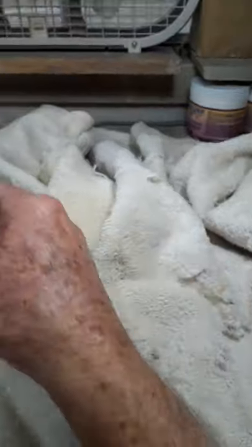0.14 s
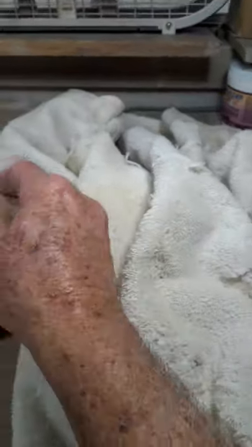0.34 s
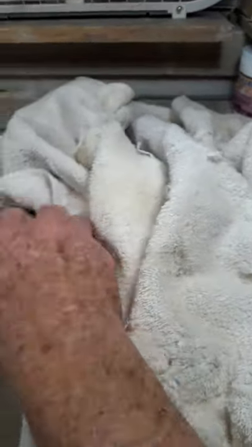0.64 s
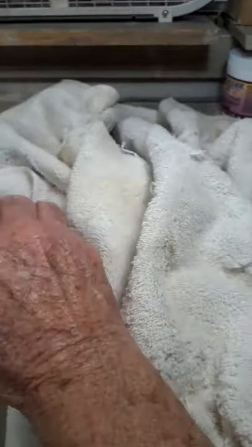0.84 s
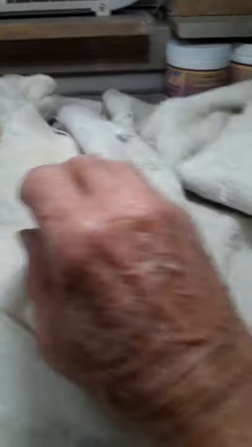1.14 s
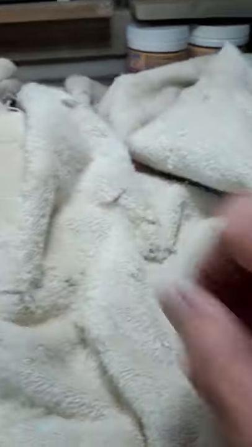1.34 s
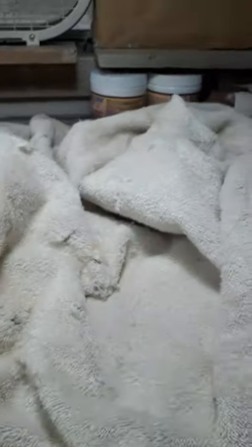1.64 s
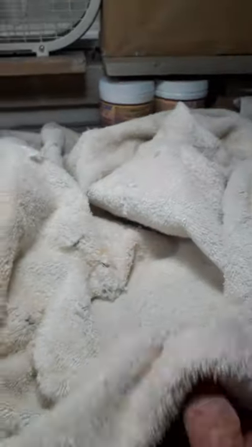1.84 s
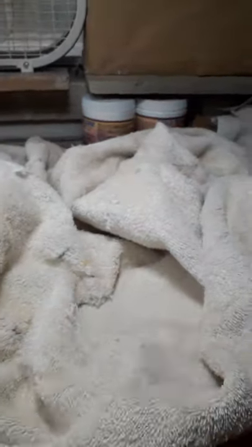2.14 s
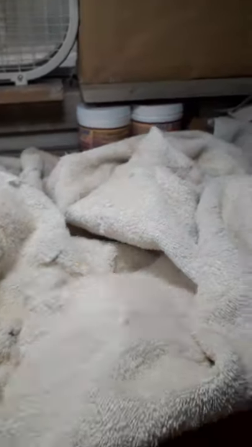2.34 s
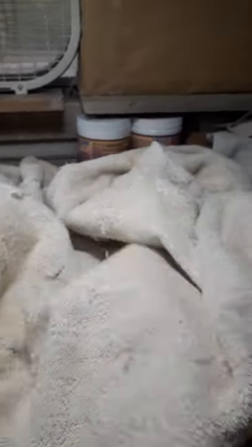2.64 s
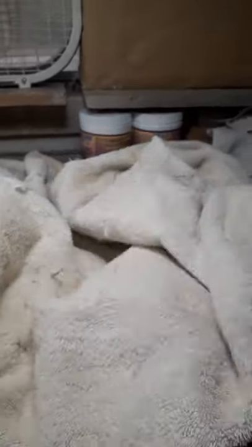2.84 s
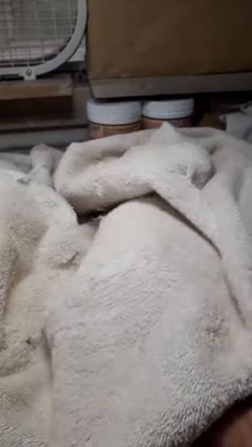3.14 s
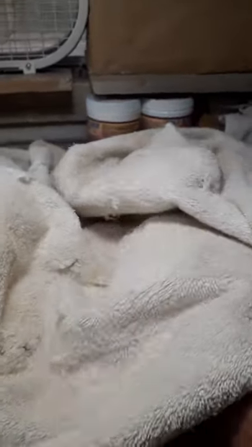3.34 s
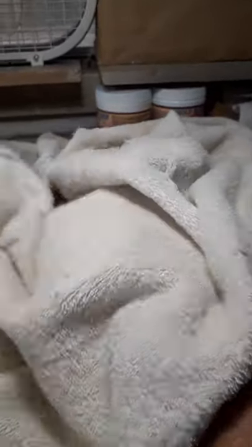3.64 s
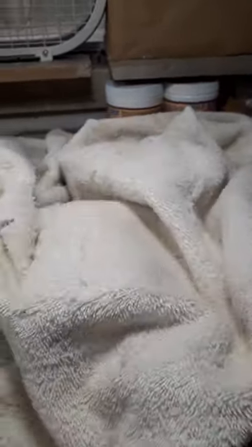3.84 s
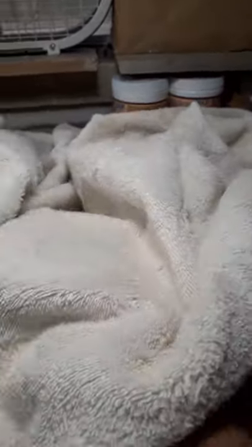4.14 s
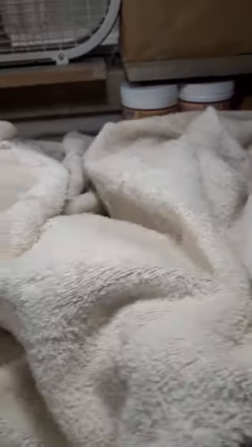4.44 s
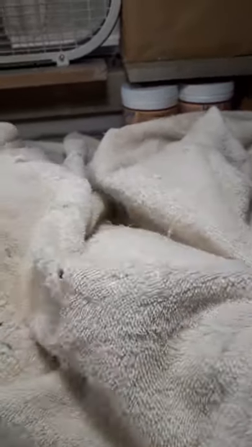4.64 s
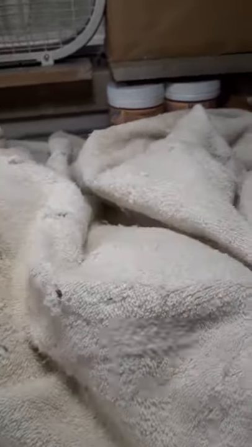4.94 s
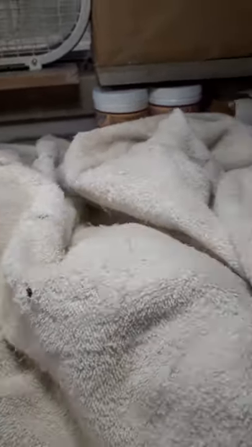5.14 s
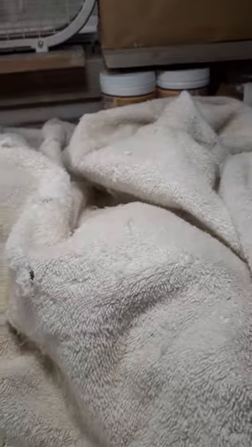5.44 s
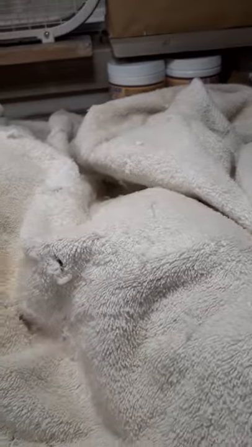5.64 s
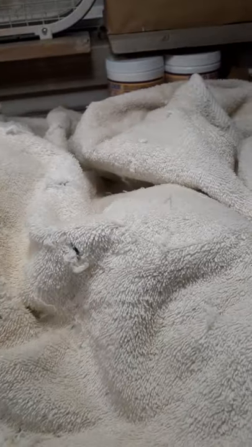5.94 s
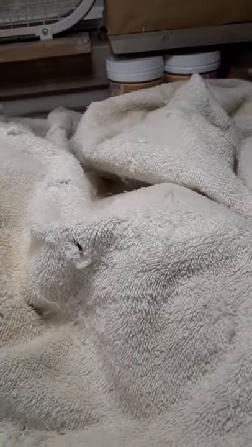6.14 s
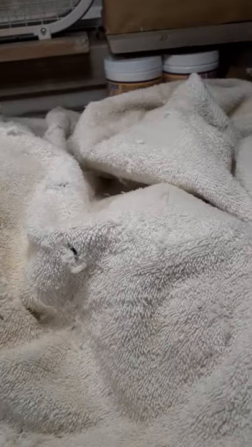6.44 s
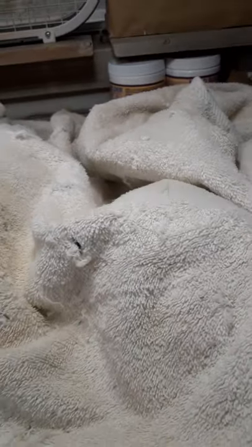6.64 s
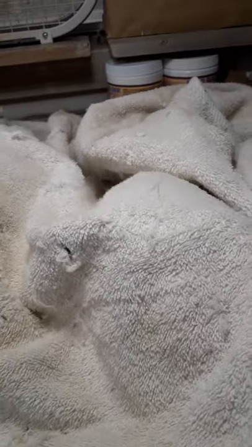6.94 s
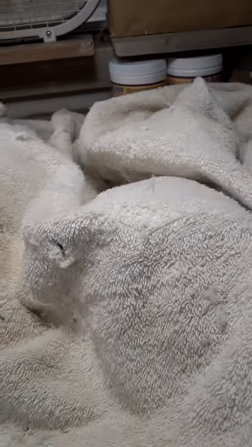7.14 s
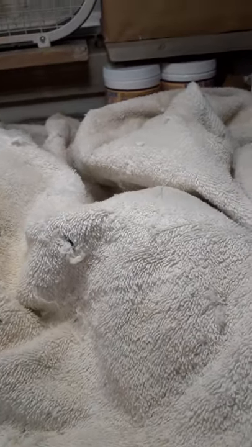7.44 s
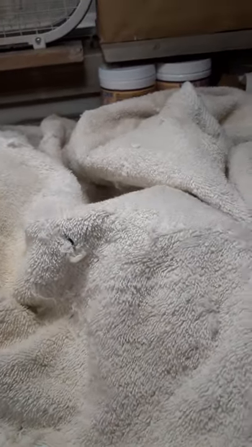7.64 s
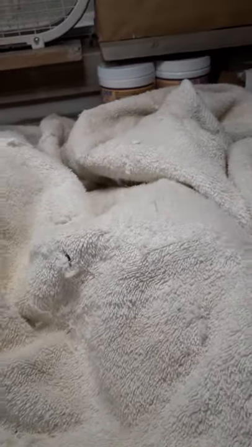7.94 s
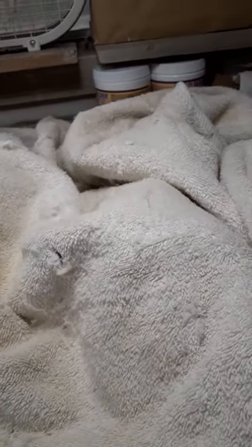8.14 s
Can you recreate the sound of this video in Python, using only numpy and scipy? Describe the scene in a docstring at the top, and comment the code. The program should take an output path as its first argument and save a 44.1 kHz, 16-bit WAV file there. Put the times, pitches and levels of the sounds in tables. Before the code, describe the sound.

Stones knock and grind together on a towel-covered wooden table, with low rumbles and soft brushing of cloth.

```python
"""Hard stones click and grind against each other as a hand sorts them on a towel.
Each knock leaves a faint, very high ring. The weight of the stones thuds and rumbles through the cloth
into the wooden table below. In between, the towel is lifted and brushed close by, and its cotton loops
hiss. A small, quiet room adds a short echo."""
import sys
import numpy as np
from scipy import signal
from scipy.fft import rfft, irfft, next_fast_len
from scipy.io import wavfile

SR = 44100
rng = np.random.default_rng(int(sys.argv[2]) if len(sys.argv) > 2 else 0)


def log_audio(samples):
    """Write samples as a 16-bit WAV file to the path given in sys.argv[1]."""
    # one column per channel
    frames = np.atleast_2d(samples).T
    # limit to full scale, then quantise
    limited = np.clip(frames, -1, 1)
    pcm = np.round(limited * 32767).astype(np.int16)
    wavfile.write(sys.argv[1], SR, pcm)


N = 366030
TIME = np.arange(N) / SR

# Levels in the tables are relative: each function adds its own gain. A positive pan_db means left.
# One stone hits another: start_s, level_db, pitch_hz, pan_db, ring_db, ring_hz
STONE_HITS = [(0.5827, -21, 4250, 2, -21.5, 11950), (0.6143, -18.5, 3580, 3, -27.5, 11900),
              (0.6405, -16, 2780, 3.5, -25.5, 11430), (0.6603, -29, 2800, 17, -41, 8980),
              (0.9981, -27, 3670, 4.5, -49, 11750), (1.0509, -32.5, 2670, 13, -40.5, 11530),
              (1.1129, -29.5, 2630, 7, -46.5, 11440), (3.6142, -26, 2200, -1, -41.5, 11750),
              (3.6277, -25.5, 2070, 13.5, -42, 11070), (3.9011, -36, 1260, -4.5, -64, 11600),
              (3.9864, -23, 2830, -2, -27, 11070), (4.248, -32, 2000, -7, -44.5, 11900),
              (4.2905, -30, 2050, -3, -48, 11800), (4.345, -25, 1910, -3.5, -47, 11650),
              (4.7297, -24, 2130, -2, -60, 11690), (4.7764, -9, 2480, -2.5, -33.5, 11880),
              (4.788, -18, 2320, -12, -61, 11960), (4.7987, -20, 2190, -0.5, -66, 11540),
              (4.8577, -24, 1650, -11, -50.5, 11060), (5.0112, -21.5, 1910, -7.5, -49, 11000),
              (5.121, -31, 1360, -4, -88, 11860), (5.7577, -30, 1960, -5, -62.5, 11060),
              (5.8529, -31.5, 2760, -3.5, -62, 11070), (6.143, -16.5, 3320, -1.5, -36, 11580),
              (6.984, -28, 2640, -1.5, -38.5, 11850), (7.1401, -32.5, 2480, -2, -50, 11800),
              (7.161, -34, 2440, 0, -50, 12400), (7.2952, -36.5, 2200, -1.5, -57.5, 11450),
              (7.603, -19, 2600, -8, -33.5, 11820), (7.6553, -25.5, 2740, 1, -34.5, 11060),
              (7.869, -24, 1250, -23, -68, 11070), (7.912, -24.5, 2760, 3.5, -61, 11650)]
# Peaks and a dip that colour every clack and scrape: pitch_hz, width_hz, gain_db
CLACK_TONE = [(2480, 230, 4), (2517, 87, 1), (3240, 430, -2.5), (4500, 1600, 1), (6300, 2900, 3)]
STONE_RESONANCE_DB = 4  # each knock rings a little at its own pitch, each scrape at 1.8 times its pitch


def knocks():
    """Each hit is a dry click that sets the stones ringing and bounces twice, sooner and weaker."""
    out = np.zeros((2, N))
    bounce_s, bounce_shrink, bounce_loss_db = .014, 0.6, 14.5
    for start_s, level_db, hz, pan_db, ring_db, ring_hz in STONE_HITS:
        click = contact(close_echoes(level_db=-2.5, fade_s=0.0041), hz, width=2.15, crack_db=-16)
        click = coloured(click, CLACK_TONE + [(hz, hz * 0.18, STONE_RESONANCE_DB)])
        click = from_db(level_db + 5.5) * placed(click / np.abs(click).max(), pan_db)
        delays_s = bounce_s * rng.uniform(.8, 1.3) * np.array([0, 1, 1 + bounce_shrink])
        for bounce, delay_s in enumerate(delays_s):
            add(out, start_s - .0003 + delay_s, from_db(-bounce * bounce_loss_db) * click)
        add(out, start_s, from_db(ring_db + 5) * stone_ring(ring_hz))
    return out


# The notes of a freely ringing stone: pitch_hz, level_db, ring_s (time to fade by 60 dB)
STONE_NOTES = [(8985, -8, .18), (11070, -1, .07), (11435, -2, .14), (12150, 0, .1), (12290, -3, .12),
               (14100, -13, .07)]


def stone_ring(ring_hz, rise_s=.0015, ring_share=0.7):
    """A struck stone favours its notes near ring_hz; fingers and cloth cut the ring to ring_share."""
    t = np.arange(9000) / SR
    note_hz, note_db, ring_s = np.transpose(STONE_NOTES)[:, :, None]
    fade = (1 - np.exp(-t / rise_s)) * from_db(-60 * t / (ring_s * ring_share))
    apart_hz = np.abs(note_hz - ring_hz)
    loss_db = 5.8 * (np.log2(1 + apart_hz / 60) + apart_hz / 700)
    strength = from_db(note_db - loss_db + rng.normal(0, 1.6, (2, len(ring_s), 1)))
    # such short waves reach left and right out of step
    left_phase = rng.random(note_hz.shape)
    right_phase = left_phase + rng.normal(0.24, 0.081, note_hz.shape)
    tones = np.sin(2 * np.pi * (note_hz * t + np.array([left_phase, right_phase]))) * fade
    return np.sum(strength * tones, axis=1) / np.sqrt(np.sum(strength ** 2) / 2)


def contact(force, hz, width, crack_db):
    """A jolted stone sends out about two waves; the shorter the touch, the higher the pitch."""
    top_hz = min(hz * width, .4 * SR)
    body = filtered(force, 1, [min(hz / width, top_hz / 1.2), top_hz], "band")
    body = filtered(body, 2, 420, "high")
    rounded = filtered(body, 6, min(hz * 1.73, SR / 3), "low")
    crack = filtered(body, 3, min(hz * 2.6, SR / 3), "low")
    return rounded + from_db(crack_db) * crack


# One stone slides on another: peak_s, rise_s, fall_s, level_db, pitch_hz
STONE_SLIDES = [(0.621, 0.022, 0.078, -27.5, 3560), (0.763, 0.052, 0.061, -36.5, 1550),
                (0.95, 0.12, 0.069, -56, 1000), (1.005, 0.011, 0.23, -50, 4350),
                (1.13, 0.046, 0.052, -45.5, 3080), (3.69, 0.053, .04, -44.5, 1620),
                (4.249, 0.046, 0.061, -39, 1340), (4.35, 0.085, 0.21, -40, 1580),
                (4.8, 0.045, 0.017, -25.5, 1760), (5.003, 0.017, 0.036, -26.5, 1790),
                (5.187, 0.0064, 0.018, -43.5, 1330), (5.57, 0.08, 0.064, -56.5, 1510),
                (5.73, 0.025, 0.048, -48.5, 1440), (5.82, 0.016, .013, -36, 1130),
                (5.862, .008, 0.024, -40, 1700), (6.075, 0.022, 0.032, -37.5, 1560),
                (6.155, 0.042, 0.049, -35, 2570), (6.208, 0.017, 0.017, -33.5, 1650),
                (6.582, 0.042, .046, -55, 1314), (7.432, 0.0052, 0.025, -42.5, 1880),
                (7.523, .009, 0.033, -42, 1090), (7.615, 0.045, 0.17, -34, 1360),
                (7.78, 0.089, 0.041, -41.5, 1940), (7.955, 0.067, .027, -35, 1580)]


def scrapes(skid_rise_s=0.0071, skid_fall_s=0.038):
    """Rough faces catch and slip; each slip is a tiny knock that also keeps the stones ringing."""
    out, pressure = np.zeros((2, N)), np.zeros((2, N))
    t = np.arange(-5000, 9000) / SR
    # after each hit the stone skids, quieter and a little lower than the click
    skids = [(start_s + skid_rise_s, skid_rise_s, skid_fall_s, db - 19.5, hz * 0.85)
             for start_s, db, hz, *_ in STONE_HITS]
    for peak_s, rise_s, fall_s, level_db, hz in list(STONE_SLIDES) + skids:
        swell = from_db(level_db) * stroke(t, rise_s, fall_s)
        echoes = close_echoes(level_db=-0.5, fade_s=0.0012)
        slips = signal.fftconvolve(echoes, grains(1100, 4.1, len(t))[None])[:, :len(t)]
        rasp = contact(slips, hz, width=2.97, crack_db=-12.5)
        stone_resonance = (hz * 1.8, hz * 0.064, STONE_RESONANCE_DB)
        rasp = rms_one(coloured(rasp, CLACK_TONE + [stone_resonance]))
        pan_db = np.interp(peak_s, [1.2, 3.6], [2, -5])  # early stones lie left, later ones right
        add(out, peak_s + t[0], from_db(0.5) * swell * placed(rasp, pan_db))
        add(pressure, peak_s + t[0], swell * rms_one(slips))
    singing = sum(from_db(db) * ring(pressure, hz, ring_s) for hz, db, ring_s in STONE_NOTES[1:])
    return out + from_db(-48) * singing


# A stone or the hand lands on the cloth: start_s, level_db, push_hz (higher is a shorter push)
LANDINGS = [(0.002, -32.5, 392), (0.443, -45, 152), (0.578, -25, 154), (0.641, -26, 155),
            (0.995, -31.5, 135), (1.572, -33.5, 101.6), (2.042, -35.5, 102), (2.546, -32.5, 153),
            (2.842, -28.5, 113), (3.303, -52, 114), (3.746, -27.5, 138), (3.777, -27, 384),
            (3.984, -18, 403), (4.66, -26.5, 153), (4.767, -25.5, 109), (5.681, -40.5, 148),
            (5.749, -33.5, 127), (5.808, -36, 278), (6.143, -27, 272), (7.292, -35.5, 161),
            (7.422, -40, 153), (7.515, -38.5, 148), (7.648, -37, 382), (7.865, -18, 312)]


def thuds():
    """The cloth softens each landing into one smooth push on the table."""
    out, t = np.zeros((2, N)), np.arange(10000) / SR
    for start_s, level_db, push_hz in LANDINGS:
        phase = 2 * np.pi * push_hz * t
        push = (1 - phase / 2) * phase * np.exp(-phase)
        thud = table_top(push)
        add(out, start_s, from_db(level_db - 5) * thud / np.abs(thud).max())
    return out


# The notes of the wooden table: pitch_hz, level_db, ring_s (time to fade by 60 dB)
WOOD_NOTES = [(59, -9.5, 0.06), (99.6, 0, 0.12), (118.5, 7, 0.056), (157, 4.5, 0.08), (217, -3.5, 0.092),
              (273, -0.5, 0.12), (320, -2.5, 0.13), (378.4, 1, 0.12), (467.5, 2.5, 0.048), (510, -3, 0.069),
              (641, -4, 0.058), (767, -10.5, 0.055), (960.5, -6.5, 0.065)]


def table_top(force):
    """The wood answers any push with the same low, quickly fading notes."""
    return sum((-1) ** k * from_db(db) * ring(force, hz, ring_s)
               for k, (hz, db, ring_s) in enumerate(WOOD_NOTES))


# The hand rolls the stones over: peak_s, rise_s, fall_s, rumble_db, hiss_db
STONE_ROLLS = [(0.01, 0.06, 0.077, -44, -66), (0.635, 0.043, 0.18, -34.5, -59), (1.06, 0.15, .13, -49, -64),
               (1.949, .06, 0.27, -53.5, -76), (2.252, 0.39, 0.25, -53.5, -56.5),
               (3.652, 0.046, 0.15, -39, -62), (4.062, 0.12, 0.079, -33.5, -63),
               (4.43, 0.45, .4, -37, -57.5), (4.799, 0.16, 0.16, -32.5, -55),
               (5.02, 0.044, 0.073, -40.5, -66), (5.17, 0.2, 0.22, -51.5, -79.5),
               (5.52, 0.053, 0.18, -57.5, -96), (5.859, 0.14, 0.08, -42, -113),
               (6.189, 0.14, 0.1, -36, -80.5), (6.588, .1, 0.12, -42.5, -71.5),
               (7.019, 0.076, 0.17, -42.5, -67.5), (7.2, 0.19, 0.19, -49, -73),
               (7.661, .14, 0.14, -32.5, -58), (7.921, 0.039, 0.11, -32, -58.5),
               (8.169, 0.087, 0.14, -50, -72.5)]
# The tone of their gritty crunch: pitch_hz, level_db
GRIT_TONE = [(300, -24), (600, 6.5), (1000, -6), (1500, -2.5), (2400, -4.5), (3200, -8.5), (4800, -12.5),
             (7000, -38), (16000, -47)]
SETTLE_RISE_S = 0.0063  # how fast a landed stone starts to settle into the cloth


def rolling(settle_db=-20.5, settle_fall_s=0.13):
    """Stones tumble over folds or settle after landing: bumps shake the table, with crunch and ticks."""
    rolls = [(peak_s, rise_s, fall_s, db) for peak_s, rise_s, fall_s, db, _ in STONE_ROLLS]
    settling = [(start_s, SETTLE_RISE_S, settle_fall_s, db + settle_db) for start_s, db, _ in LANDINGS]
    bumps = [table_top(grains(200, 2.7, N)) for _ in range(2)]
    lurches = from_db(-1.5 + 4 * drift(per_s=28))  # the stones roll unevenly
    rumble = lurches * stereo(*bumps)
    grit = from_db(-15 + 4.52 * drift(per_s=60)) * stereo(*grains(2500, 1.8, (2, N)), GRIT_TONE)
    touches = grains(per_s=12, uneven_db=3, size=N)
    ticks = from_db(-24) * rms_one(contact(touches, hz=2120, width=1.4, crack_db=-14))
    return swells(rolls + settling) * (rumble + grit + ticks)


# The towel alone is lifted and brushed: peak_s, rise_s, fall_s, level_db
TOWEL_BRUSHES = [(1.58, 0.0087, 0.17, -63.5), (1.73, 0.095, 0.048, -60), (1.92, 0.072, 0.06, -52.5),
                 (2.15, 0.0091, 0.024, -47), (2.2, 0.15, 0.31, -53.5), (2.58, .08, 0.022, -50.5),
                 (2.79, 0.098, 0.037, -62.5), (2.855, .012, 0.026, -56.5), (2.94, 0.098, 0.35, -59.5),
                 (3.14, 0.16, 0.23, -64.5), (3.56, 0.31, 0.23, -71), (6.76, 0.39, 0.16, -74.5)]
# The tone of its fine, bright hiss: pitch_hz, level_db
HISS_TONE = [(200, 8), (600, -10), (1200, -5), (2500, -6.5), (4500, -1), (6500, -2.5), (8500, 1.5),
             (12000, 3.5), (14000, 0.5), (16000, -5.5)]
# The hand sweeps quickly along the cloth: peak_s, rise_s, fall_s, level_db
HAND_SWISHES = [(1.953, 0.045, 0.033, -35.5), (2.572, 0.035, 0.028, -51), (8.16, 0.025, 0.03, -54.5)]
# The fuller tone of those sweeps: pitch_hz, level_db
SWISH_TONE = [(300, -17), (650, 0), (1200, 0), (2500, -3.5), (5000, -2.5), (8000, -6.5), (16000, -13.5)]


def towel(drag_stretch=1.28, crush_db=-42, crush_fall_s=0.27):
    """Countless cotton loops hiss as they flick past the skin or under a stone."""
    # rolling stones drag the cloth, whose hiss swells and fades more slowly than their rumble
    dragged = [(peak_s, rise_s * drag_stretch, fall_s * drag_stretch, hiss_db)
               for peak_s, rise_s, fall_s, _, hiss_db in STONE_ROLLS]
    crushed = [(start_s, SETTLE_RISE_S, crush_fall_s, db + crush_db) for start_s, db, _ in LANDINGS]
    catches = from_db(6.5 + 1.68 * drift(per_s=90))  # the loops catch in small clumps
    hiss = catches * stereo(*grains(9000, 2.8, (2, N)), HISS_TONE)
    swish = stereo(*grains(9000, 6.7, (2, N)), SWISH_TONE)
    return swells(list(TOWEL_BRUSHES) + dragged + crushed) * hiss + swells(HAND_SWISHES) * swish


def close_echoes(level_db, fade_s, size=1500):
    """A click arrives directly, then bounces off hand, table and jars, differently on each side."""
    t = np.arange(size) / SR
    echoes = grains(3500, 0.46, (2, size)) * np.exp(-t / fade_s) * (t > .0004)
    paths = from_db(level_db) * echoes / np.sqrt(np.sum(echoes ** 2, axis=1, keepdims=True) + 1e-12)
    paths[:, 0] = 1
    return paths


# How strongly the room echoes: pitch_hz, level_db
ECHO_TONE = [(100, -6.5), (500, -13.5), (2000, -18.5), (6000, -14.5), (14000, -18)]


def room_echo(sound, bass_ring_s=0.37, treble_ring_s=0.55, size=26000):
    """Many echoes blur into one tail, whose low notes die away sooner than its high ones."""
    t, tail = np.arange(size) / SR, 0
    edges_hz = np.geomspace(45, 18000, 10)
    ring_times_s = np.geomspace(bass_ring_s, treble_ring_s, len(edges_hz) - 1)
    for low_hz, high_hz, ring_s in zip(edges_hz, edges_hz[1:], ring_times_s):
        hz = np.sqrt(low_hz * high_hz)
        fade = from_db(-60 * t / ring_s) * np.clip(t / 0.0045 - .5, 0, 1)
        mid, side = filtered(rng.standard_normal((2, size)), 2, [low_hz, high_hz], "band")
        alike = at_hz(SIDES_ALIKE, hz)
        pair = np.sqrt((1 + alike) / 2) * mid + np.sqrt((1 - alike) / 2) * side * SIDES
        tail = tail + from_db(at_hz(ECHO_TONE, hz)) * pair * fade / np.sqrt(np.sum(fade ** 2))
    return signal.fftconvolve(sound.sum(axis=0, keepdims=True) / np.sqrt(2), tail)[:, :N]


# The tone of the quiet room: pitch_hz, level_db
HUSH_TONE = [(15, -49), (25, -25), (70, 5.5), (427, -19.5), (463, -12), (5140, -24.5), (6740, -43.5),
             (8360, -13.5), (12200, -20.5), (14000, -18), (16000, -11.5)]


def room_hush(level_db=-72.5):
    """A very faint, steady noise lies under everything."""
    return from_db(level_db) * stereo(*rng.standard_normal((2, N)), HUSH_TONE)


# How alike left and right are: pitch_hz, likeness (1 is the same, 0 is unrelated)
SIDES_ALIKE = [(100, .92), (300, .75), (700, .6), (2000, .4), (5000, .15), (12000, -.1)]
# Which side is louder: pitch_hz, pan_db
SIDES_BALANCE = [(100, 1.5), (300, 0), (600, -3), (2000, -5), (5000, -5.5), (12000, -1.5)]
SIDES = np.array([[1], [-1]])  # left, right


def stereo(mid, side, tone=None):
    """Two unrelated sounds become a left and a right, alike in the bass and apart in the treble."""
    size = next_fast_len(N)
    hz = np.fft.rfftfreq(size, 1 / SR)
    alike = at_hz(SIDES_ALIKE, hz)
    pair = np.sqrt(1 + alike) * rfft(mid, size) + np.sqrt(1 - alike) * rfft(side, size) * SIDES
    tone_db = at_hz(tone, hz) if tone else 0
    gains = from_db(tone_db + SIDES * at_hz(SIDES_BALANCE, hz) / 2)
    return rms_one(irfft(pair * gains, size)[:, :N])


def placed(pair, pan_db, samples_per_db=2.05):
    """The louder side hears a sound a few samples sooner."""
    n = np.arange(pair.shape[-1])
    leads = SIDES * samples_per_db * pan_db / 2
    shifted = np.array([np.interp(n + lead, n, x) for lead, x in zip(leads, pair)])
    return rms_one(from_db(SIDES * pan_db / 2)) * shifted


def grains(per_s, uneven_db, size):
    """Tiny slips at random moments, some stronger than others, each a push or a pull."""
    strength = from_db(uneven_db * np.minimum(rng.exponential(1, size), 4))
    return (rng.random(size) < per_s / SR) * strength * rng.choice([-1, 1], size)


def drift(per_s):
    """A value that wanders around zero, gliding to a new random point per_s times a second."""
    points = rng.standard_normal(4000)
    return np.interp(TIME * per_s, np.arange(len(points)), points)


def stroke(t, rise_s, fall_s):
    """A movement grows by 20 dB in rise_s, peaks at t = 0 and fades by 20 dB in fall_s."""
    return from_db(-20 * np.maximum(-t / max(rise_s, .002), t / max(fall_s, .002)))


def swells(moves):
    """The combined strength of overlapping movements at every sample."""
    t = np.arange(0, N / SR, .001)
    power = sum((from_db(db) * stroke(t - peak_s, rise_s, fall_s)) ** 2
                for peak_s, rise_s, fall_s, db in moves)
    return np.interp(TIME, t, np.sqrt(power))


def ring(force, hz, ring_s):
    """Every push starts a pure note that fades by 60 dB in ring_s."""
    decay, angle = from_db(-60 / (ring_s * SR)), 2 * np.pi * hz / SR
    return signal.lfilter([0, np.sin(angle)], [1, -2 * decay * np.cos(angle), decay ** 2], force + 1e-18)


def coloured(x, peaks):
    """Turn the sound up or down around each listed pitch."""
    for hz, width_hz, gain_db in peaks:
        b, a = signal.iirpeak(hz, hz / width_hz, fs=SR)
        x = x + (from_db(gain_db) - 1) * signal.lfilter(b, a, x + 1e-18)
    return x


def filtered(x, order, hz, keep):
    """Keep the "low" part, the "high" part or a "band"; a higher order cuts more sharply."""
    return signal.sosfilt(signal.butter(order, hz, keep, fs=SR, output="sos"), x)


def at_hz(points, hz):
    """Read a table at any pitch, gliding between its rows."""
    pitches_hz, values = np.transpose(points)
    return np.interp(np.log(hz + 1e-9), np.log(pitches_hz), values)


def add(out, start_s, sound):
    """Mix a stereo sound in at start_s."""
    start = int(round(start_s * SR))
    first, last = max(start, 0), min(start + sound.shape[-1], N)
    if last > first:
        out[:, first:last] += sound[..., first - start:last - start]


def from_db(db):
    """Turn decibels into a number to multiply by."""
    return 10 ** (np.asarray(db) / 20)


def rms_one(x):
    """Scale a sound to an average strength (rms) of 1."""
    return x / np.sqrt(np.mean(x ** 2) + 1e-20)


def scene():
    """Stones, table and towel close by, in a quiet room."""
    close = knocks() + scrapes() + thuds() + rolling() + towel()
    return close + room_hush() + room_echo(close)


def record(dry, low_cut_hz=38, high_cut_hz=15900):
    """The microphone loses the deepest bass; the highest treble is cut steeply."""
    thinned = filtered(dry, 2, low_cut_hz, "high")
    return signal.sosfilt(signal.ellip(12, .1, 80, high_cut_hz, fs=SR, output="sos"), thinned)


dry = scene()
out = record(dry)
log_audio(out)
```